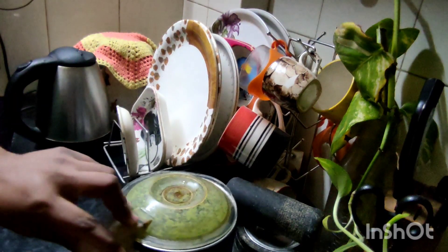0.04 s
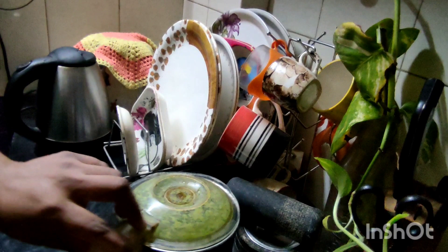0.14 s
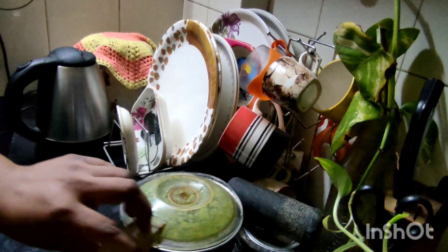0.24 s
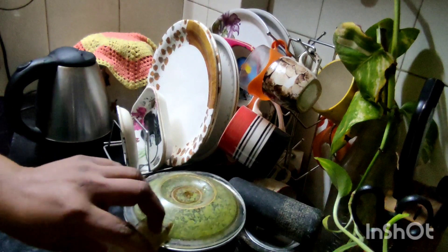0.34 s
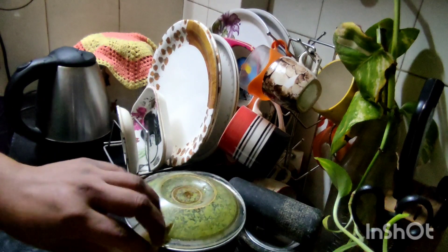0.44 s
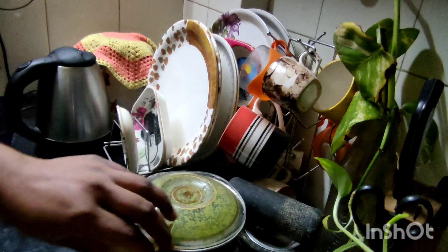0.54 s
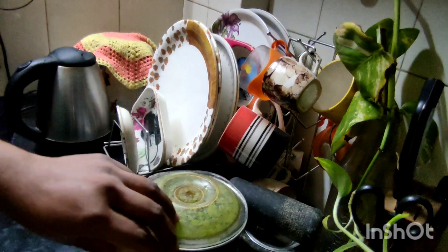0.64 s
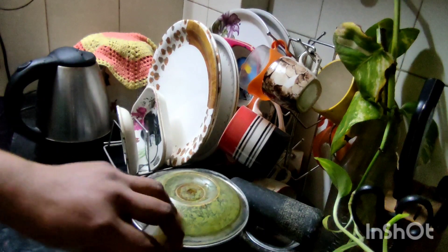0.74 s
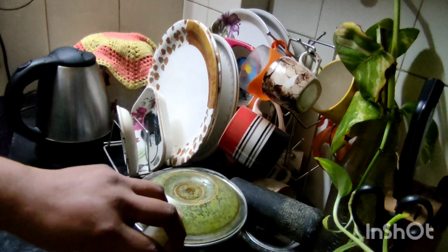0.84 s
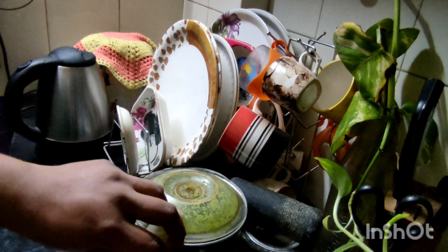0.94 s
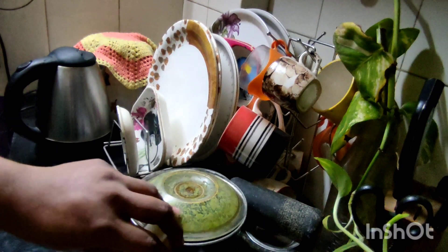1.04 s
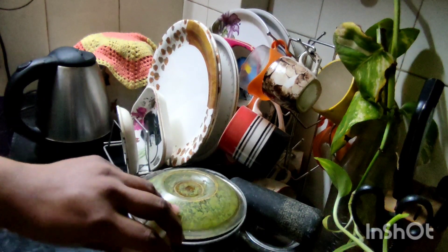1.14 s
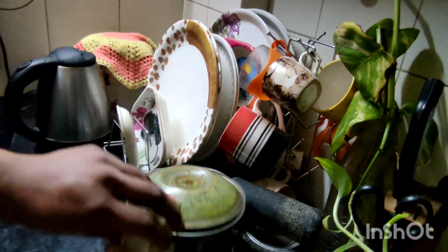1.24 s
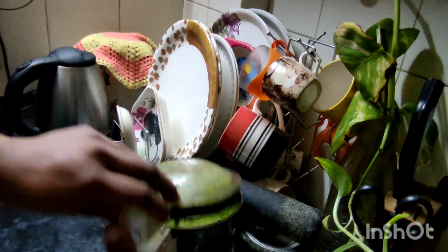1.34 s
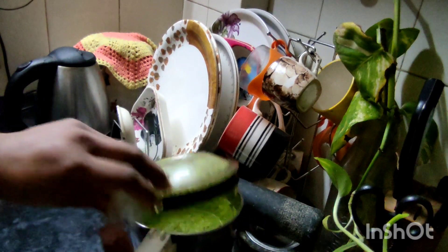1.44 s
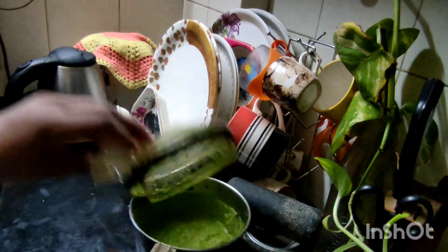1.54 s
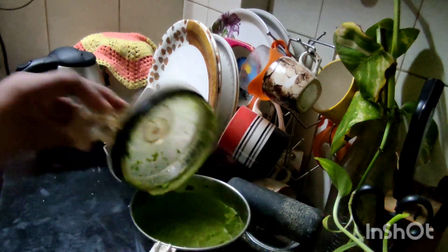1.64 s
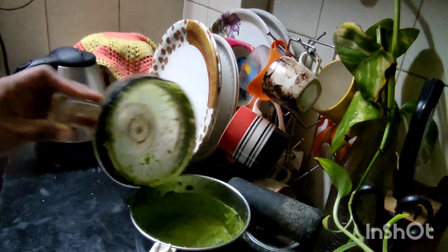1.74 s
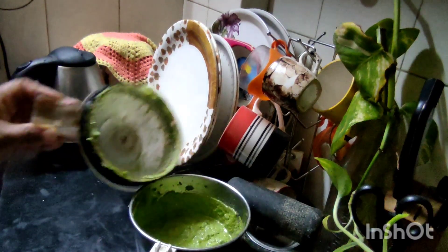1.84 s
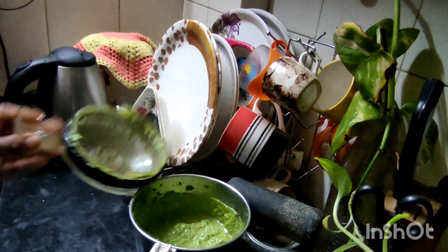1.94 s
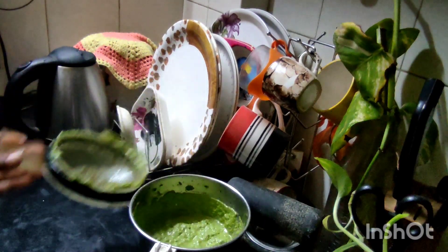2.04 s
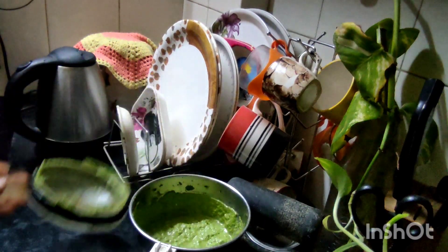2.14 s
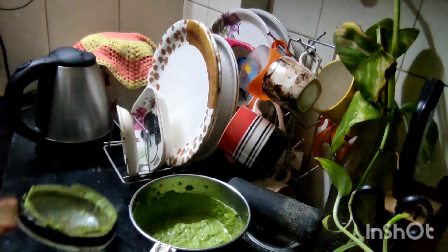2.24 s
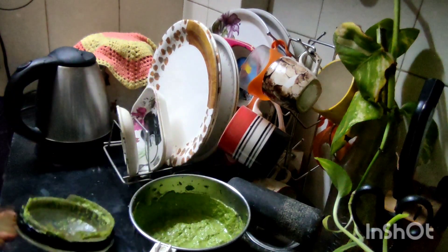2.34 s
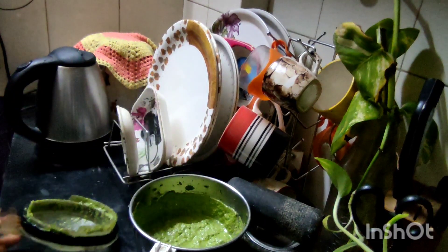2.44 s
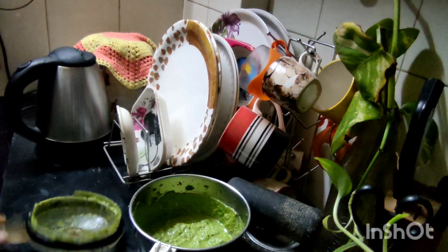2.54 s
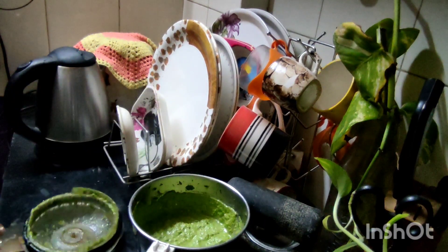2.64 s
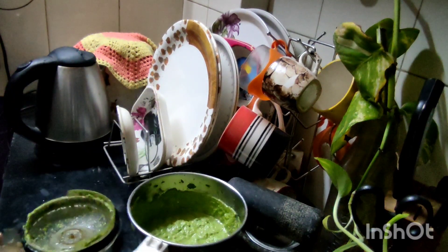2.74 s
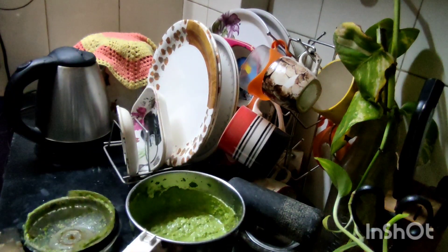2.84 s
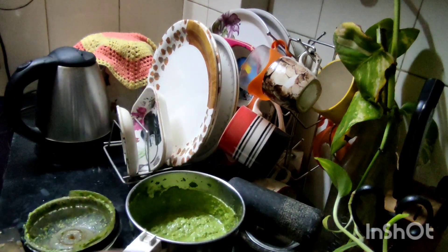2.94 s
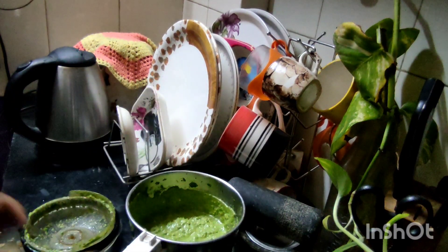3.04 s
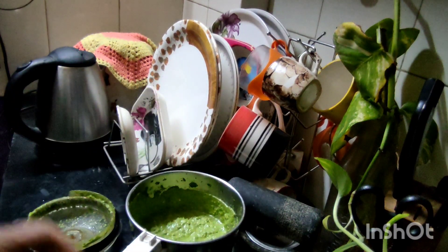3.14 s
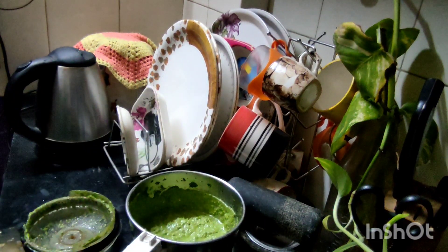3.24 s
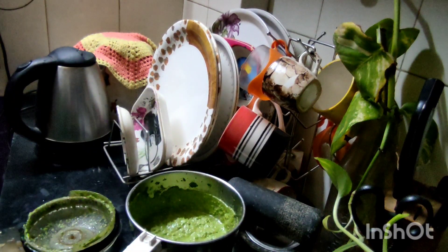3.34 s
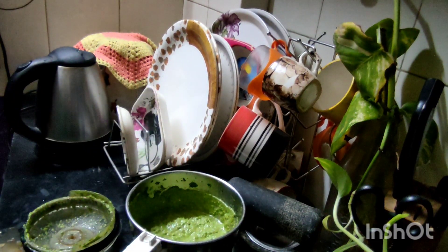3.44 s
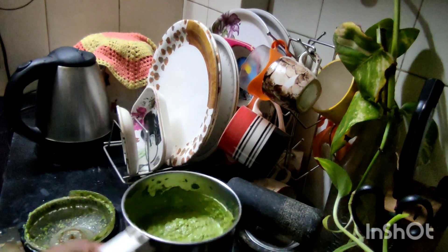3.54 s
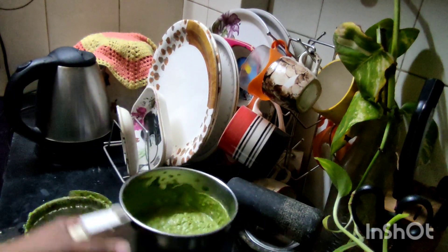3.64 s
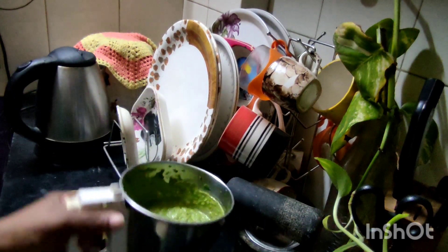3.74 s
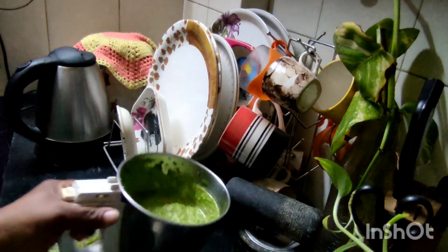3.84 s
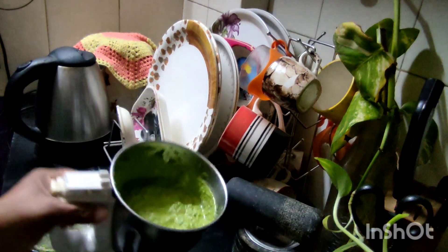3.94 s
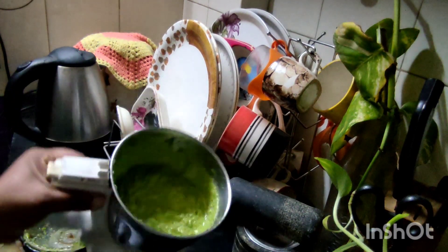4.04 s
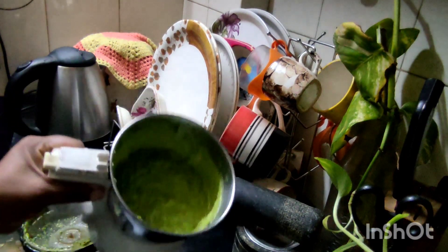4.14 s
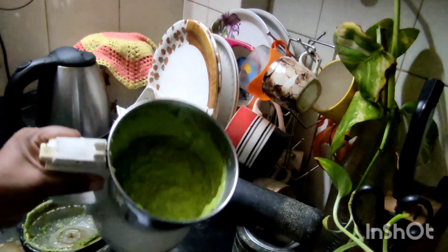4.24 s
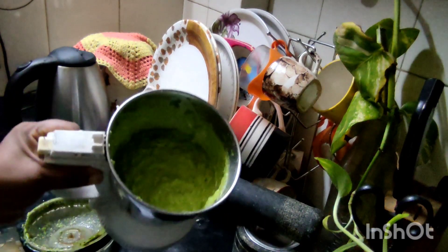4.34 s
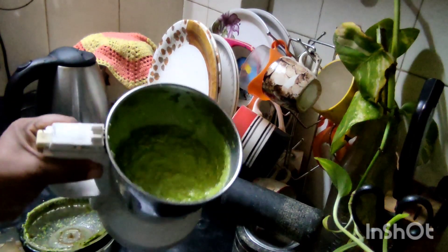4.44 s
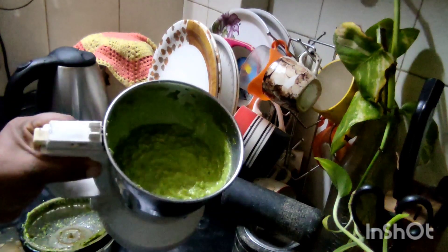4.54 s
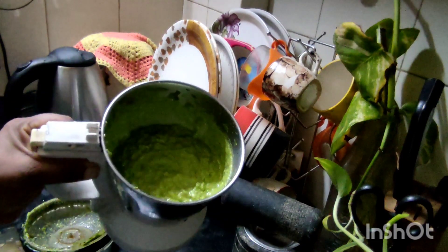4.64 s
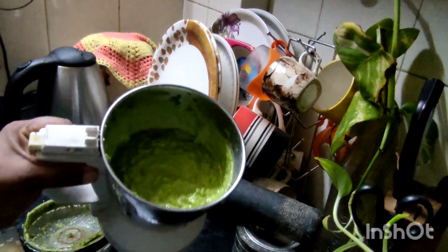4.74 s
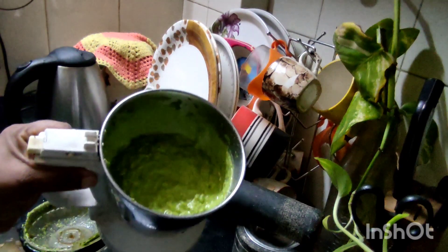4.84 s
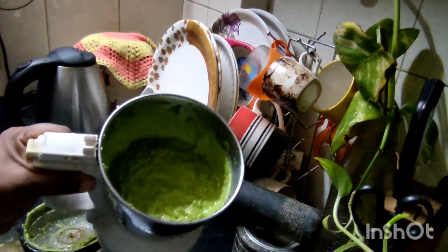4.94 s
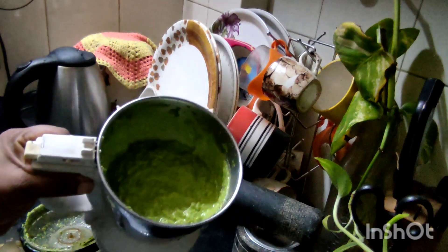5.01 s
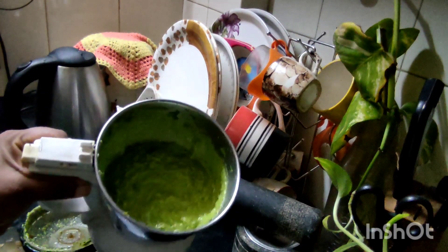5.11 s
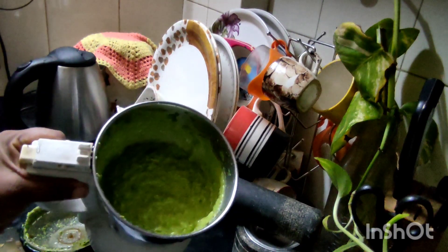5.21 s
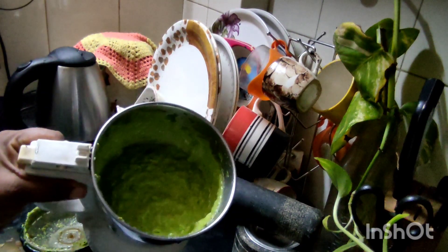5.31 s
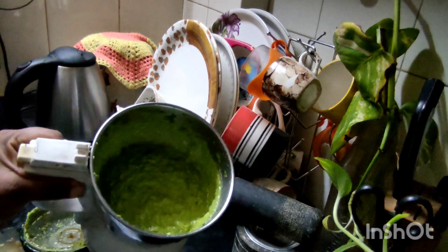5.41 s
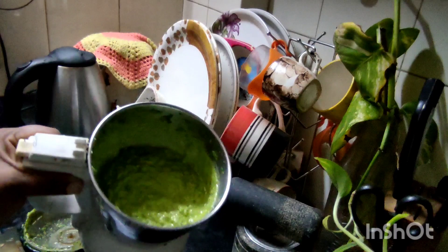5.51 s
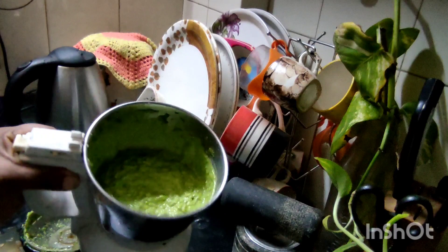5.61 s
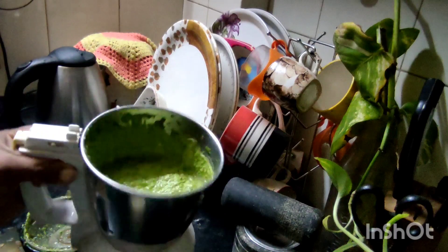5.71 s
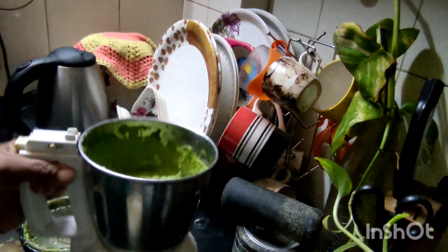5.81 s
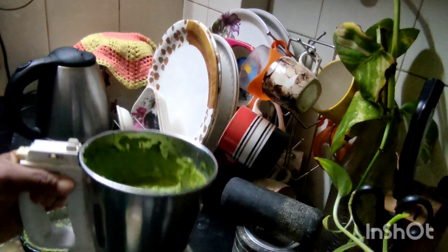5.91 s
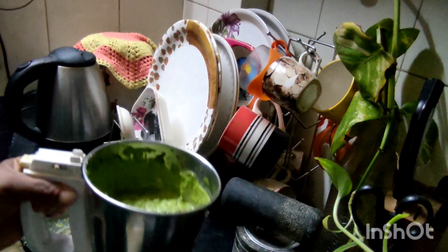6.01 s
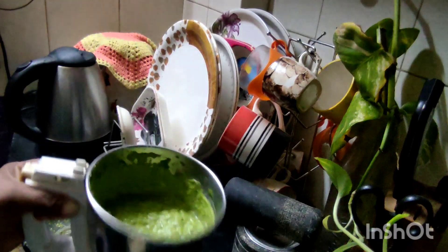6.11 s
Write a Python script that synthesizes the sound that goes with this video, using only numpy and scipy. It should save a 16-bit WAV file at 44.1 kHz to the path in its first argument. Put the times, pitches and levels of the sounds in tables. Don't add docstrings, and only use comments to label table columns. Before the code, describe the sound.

Close to the microphone, a hand rubs and taps a tight plastic lid on a stone counter with dull thuds. The seal gives way in one loud pop, the lid clacks down, a steel jar knocks sharply and, when lifted, rings briefly. Then quiet: low town rumble with far hoarse crows and a thin bird whistle.

```python
import sys
import numpy as np
from scipy import signal
from scipy.fft import rfft, irfft, next_fast_len
from scipy.io import wavfile
from scipy.ndimage import uniform_filter1d

SR = 44100
rng = np.random.default_rng(int(sys.argv[2]) if len(sys.argv) > 2 else 0)


def convert_level_to_amplitude(level_db):
    exponent = np.asarray(level_db, float) / 20
    return 10 ** exponent


def wav_record(signal):
    frames = np.transpose(np.atleast_2d(signal))
    bounded = np.clip(frames, -1, 1)
    quanta = np.round(bounded * 32767).astype(np.int16)
    wavfile.write(sys.argv[1], SR, quanta)


N = 272097

# frequency in Hz, density in dB per Hz.
TOWN_SPECTRUM = [(14, 2), (23, 1), (31, -19), (50, -22), (64, -4), (100, -9.5), (190, -16.5), (245, -23),
                 (305, -18), (400, -25.5), (900, -29.5), (2400, -35.5), (7000, -45), (9400, -52.5),
                 (13800, -46.5), (14500, -63.5)]
# frequency in Hz, left-right correlation.
PORT_LIKENESS = [(60, 0.89), (180, 0.89), (540, 0.065), (1630, -0.081), (4880, -0.14), (14700, -0.01)]
# time in s, spread in s, swell in dB, highest pitch reached in Hz.
VEHICLE_PASSES = [(.001, 0.2, 5.5, 59.7), (.45, 0.091, 3, 90), (1.6, 0.35, 6.5, 60), (2.0, 0.26, 2.5, 150),
                  (2.6, 0.29, 5.5, 80), (3.2, 0.36, 4, 89), (3.9, 0.27, 6, 90), (4.58, 0.18, 15, 40),
                  (4.9, 0.11, 4.5, 120), (6.0, 0.055, 4, 60)]
# start in s, length in s, pitch in Hz, level in dB, 4th harmonic against it in dB.
EVEN_CAWS = [(1.97, 0.17, 556, -70, -7.5), (2.35, 0.27, 543, -67, -12), (2.925, 0.23, 517.6, -66.5, -5.5),
             (3.67, 0.18, 588.5, -60, -17), (4.05, 0.18, 520, -67.5, -7), (4.237, 0.16, 532, -69.5, -27),
             (4.701, 0.11, 560, -65.5, -29), (5.695, 0.23, 532, -65, -11), (6.118, 0.08, 502, -76, -10)]
# start in s, length in s, pitch in Hz, level in dB, 4th harmonic in dB.
FALLING_CAWS = [(4.9, 0.18, 560, -63, -9), (5.02, .2, 565, -64, -16), (.935, 0.17, 590, -65, -31),
                (5.3, 0.22, 594, -69.5, -23)]
# start in s, length in s, pitch in Hz, level in dB, 4th harmonic in dB.
OPEN_CAWS = [(.25, .12, 481, -74, -9.5), (4.79, 0.24, 520, -64.5, -22), (5.42, 0.15, 526, -70, -22),
             (5.55, 0.15, 490, -74.5, -20)]
# start in s, length in s, start pitch in Hz, end pitch in Hz, level in dB.
CHIRPS = [(0.9, 0.12, 7000, 7000, -73), (2.95, .15, 6500, 6400, -94), (4.151, 0.22, 6240, 5500, -79),
          (5.104, 0.23, 7000, 7000, -76), (5.504, 0.16, 6350, 5100, -77.5),
          (6.051, 0.16, 5600, 6100, -77.5)]
# frequency in Hz, t60 in s.
KITCHEN_DECAY = [(150, 0.37), (600, 0.41), (2000, 0.33), (6000, 0.33), (12000, 0.3)]
# frequency in Hz, level in dB, t60 in s.
COUNTER_MODES = [(96.8, 3.5, 0.44), (117.1, -3.5, 0.39), (143.7, -7, 0.61), (186.5, 0, 0.26),
                 (228.2, -5, 0.19), (302.6, -12, 0.47), (402.4, -15.5, 0.32), (451.7, -19, 0.25),
                 (520, -9, 0.044)]
# start in s, blow in dB, weight of upper modes in dB, factor on t60.
THUDS = [(0.097, -29.5, -20, 0.73), (0.115, -25, -21, 0.6), (0.176, -25, -10.5, 0.25),
         (0.178, -29, -32, 0.98), (0.222, -26.5, -12.5, 0.54), (0.255, -30, -11.5, 0.79),
         (0.273, -22.5, -11.5, 0.26), (.755, -48, 0, .5), (.795, -46, 0, .5), (0.838, -37, -1, 0.3),
         (1.086, -27, -26, 0.35), (1.177, -29.5, 1, 0.29), (1.23, -40.5, -9, 1), (1.388, -21, -29, 0.23),
         (1.394, -9, 2.5, 0.33), (1.429, -18, -2.5, 0.5), (1.519, -33, -0.5, 0.41),
         (1.579, -36.5, -9.5, 0.57), (1.738, -46, -3, 0.43), (2.231, -38.5, -38, 0.66),
         (2.605, -42.5, -10, 1), (2.747, -34.5, -11.5, 0.61), (3.362, -43, -2.5, 0.74),
         (3.428, -41, -13, 0.52), (3.545, -59.5, 8.5, 1), (3.791, -43.5, -11, 0.61), (3.846, -40, -7, 0.85)]
# start in s, level in dB, pitch in Hz, t60 in s.
FINGER_TAPS = [(0.22, -39, 596, 0.032), (0.254, -35, 505, 0.029), (0.84, -53.5, 623, 0.081),
               (1.087, -49.5, 640, 0.083), (1.177, -30, 832, 0.03), (1.286, -55, 520, 0.13),
               (1.328, -51, 549, 0.23), (1.396, -27, 500, .1), (1.42, -37, 460, .12),
               (1.866, -49, 1123, 0.079), (3.38, -56, 632, 0.16), (3.651, -44.5, 900, 0.032),
               (3.783, -48, 750, 0.051), (3.845, -35.5, 636, 0.045)]
# peak in s, rise in s, fall in s, pressure in dB, hollow share in dB.
RUB_STROKES = [
    [(.07, 0.34, 0.23, -56, -9), (.17, 0.0053, 0.18, -60.5, -7)],
    [(.53, 0.13, 0.2, -54, -34), (.648, 0.19, 0.13, -57.5, 3), (.85, 0.08, 0.096, -69.5, 6.5)],
    [(1.094, 0.035, 0.14, -53.5, -17), (1.15, 0.085, 0.059, -54, 0), (1.19, 0.083, 0.04, -52, -13.5)],
    [(1.33, .1, 0.077, -70, 5), (1.385, 0.052, 0.016, -54, -5)],
    [(2.3, 0.084, 0.23, -57, -20.5), (2.42, 0.1, .1, -62.5, 3.5), (2.6, 0.18, 0.033, -54, -18),
     (2.612, 0.0066, 0.1, -48.5, -16), (2.71, 0.079, 0.01, -60.5, -26)],
    [(2.92, 0.048, 0.49, -68.5, -17), (3.17, 0.066, 0.34, -76.5, -6), (3.375, 0.03, 0.18, -57, -33),
     (3.445, 0.014, 0.06, -55, -8), (3.5, 0.11, 0.064, -48, -6), (3.58, 0.13, 0.13, -49, -10.5)],
    [(3.786, 0.0067, 0.1, -53.5, -15), (3.82, .03, 0.043, -64, 3)],
    [(4.552, 0.046, 0.099, -82.5, 10), (4.61, 0.061, 0.35, -84, -3)],
]
# frequency in Hz, density in dB per Hz.
RUB_SPECTRUM = [(250, -32), (500, -11), (1000, -5), (1800, -3), (3000, -4), (5000, -9.5), (7500, -12.5),
                (9500, -27.5), (14000, -27.5), (14600, -60)]
# frequency in Hz, width in Hz, level in dB.
RUB_HOLLOWS = [
    [(2970, 220, -5.5), (6650, 1070, -21)],
    [(1693, 120, -7), (1877, 150, -7), (2710, 160, -15), (4400, 3000, -25)],
    [(770, 270, -2), (1798, 150, 0.5), (2165, 290, -1), (2790, 190, 3.5), (3006, 110, 2.5),
     (3870, 240, -11), (4880, 190, -4.5), (5700, 230, -8), (6200, 148, -5)],
    [(560, 110, 2), (1800, 270, -6)],
    [(2200, 140, 1), (1286, 200, 1), (7000, 1320, -26)],
    [(1722, 84, -4), (1850, 170, -0.5), (2880, 220, 0), (1020, 120, -12), (3790, 90, -10), (5430, 90, -10),
     (5790, 110, -12), (6950, 91, -9)],
    [(2150, 140, -1), (3360, 120, -5), (7100, 920, -13)],
    [(3740, 1400, -2.5)],
]
# brightness in dB, counter shake against pressure in dB, left-right in dB,
# rise of hollow pitch in share per s.
RUB_SURFACES = [(-2.5, -3.5, -1, .01), (-3, -3.5, -2.5, 0.13), (-4, -0.5, -1.5, 0.033), (-6, 6.5, -1, .01),
                (-6.5, -2.5, -0.5, 0.079), (-5, -5, -1, 0.3), (-8.5, 0, -1.5, .01), (7.5, -13, -3, .01)]
# start in s, blow in dB, brightness in dB, ring in dB, left-right in dB.
LID_KNOCKS = [
    (1.729, -38.5, -37, -1.5, -3),
    (1.853, -60, -35, 0, -1.5),
    (1.865, -39, -20, -5, -2.5),
    (1.879, -54, -30, 6, 1),
    (2.23, -22, 4.5, 2.5, -0.5),
]
# start in s, blow in dB, brightness in dB, ring in dB, left-right in dB.
JAR_KNOCKS = [
    (2.722, -28, -4.5, 4.6, -0.5),
    (2.75, -24.5, -0.5, 1.9, -1),
    (2.7535, -24.5, -4.5, 5.8, -0.2),
    (2.775, -40.5, -11, 7.7, -1),
]
# start in s, blow in dB, brightness in dB, ring in dB, left-right in dB.
LIFT_KNOCKS = [
    (3.8455, -24, -8, -11.5, -0.42),
    (3.849, -36, -15.5, 10, -1),
    (3.862, -47, -17, 10, -1),
    (3.877, -46.5, -19, 11.5, -1),
]
# start in s, blow in dB, brightness in dB, ring in dB, left-right in dB.
SEAL_KNOCKS = [
    (0.17, -34, -6, -6, -1.6),
    (0.84, -42, -41, -31, 4),
    (1.287, -46, -38, -20, 3),
    (1.395, -13.5, -12.5, -2, -1.5),
    (2.61, -37, -21, 3.5, -3),
    (3.368, -58, -17, 0, -1),
    (3.783, -42.5, -12, -8, 0),
]
# frequency in Hz, level in dB, t60 in s.
LID_MODES = [(618, -15.5, 0.27), (980, -2, 0.06), (1253, -4, 0.33), (1800, -21.5, 0.24), (2770, -21, 0.082),
             (3250, -1.5, 0.04), (3580, -13, 0.1), (4180, -22, 0.11), (4343, -9.5, 0.13), (6980, -8, 0.063),
             (1275, 2, .08)]
# frequency in Hz, level in dB, t60 in s.
JAR_MODES = [(628, -9, 0.15), (1375, 1, 0.15), (1420, 0, 0.19), (1610, -2, 0.055), (1893, -8, .07),
             (2337, -2.5, 0.16), (2744, -13, .15), (3090, -5, 0.13), (3305, -1.5, .14), (3454, 3, 0.1),
             (3927, 0.5, 0.06), (4400, -14, 0.092), (5480, -15.5, 0.13), (6880, -8.5, 0.093)]
# frequency in Hz, level in dB, t60 in s.
LIFTED_MODES = [(620, -11, .05), (1328, 0.5, 0.19), (1382, -4, 0.34), (1790, -13, .3), (2080, -7, .14),
                (2270, -10.5, 0.29), (2530, -5, .06), (2920, -3, 0.058), (3250, -5, 0.12),
                (3666, -2.5, 0.13), (3811, -10, 0.19), (4355, -8, 0.18), (5080, -14, 0.11),
                (7284, -16, 0.23)]
# frequency in Hz, level in dB, t60 in s.
SEAL_MODES = [(694, -11, 0.14), (977, -8, 0.04), (1420, -12.5, .04), (1604, -2, 0.04), (1920, 5, 0.027),
              (2347, 0.5, .03), (2637, 0, 0.036), (2820, -6, 0.048), (3297, -7, 0.043), (3770, -3.5, 0.03),
              (4900, -8.5, .04), (5500, -8, 0.018)]
# frequency in Hz, density in dB per Hz.
LID_CRACK = [(200, -36), (500, -5.5), (900, -8.5), (1500, -21), (2500, -18), (3600, -16), (7200, -14.5),
             (9500, -26), (13500, -33), (15500, -34)]
# frequency in Hz, density in dB per Hz.
JAR_CRACK = [(180, -46), (300, -7), (1060, -10), (1380, -9.5), (2840, -4.5), (3400, -8.5), (7230, -14.5),
             (13700, -53), (15100, -67)]
# frequency in Hz, density in dB per Hz.
SEAL_CRACK = [(240, -41), (400, -8), (735, -10), (1550, -16.5), (3070, -18.5), (3510, -20.5), (6760, -19.5),
              (8750, -34.5), (9730, -54), (14200, -54), (15100, -81)]
# dB per dB of brightness, offset in dB.
UPPER_LID, UPPER_JAR, UPPER_SEAL = (0.35, 2.2), (1.35, 9.3), (.01, .1)
# dB per dB of brightness, offset in dB.
UPPER_LIFTED = (0.65, 8.5)
MODE_TWINS = [
    (.014, .4, .35),
    (0.0239, 0.72, .5),
    (.022, .6, .35),
    (0.02, 0.86, 0.32),
]
# start in s, peak in dB, width in s.
PRESSURE_POPS = [
    (1.396, -10, .00022),
    (2.2305, -34, .0001),
    (1.7295, -44, .00025),
    (3.8457, -33, .00015),
]


def evened(x):
    return x / np.sqrt(np.mean(x ** 2) + 1e-20)


def read(points, hz):
    point_hz, value = np.transpose(points)
    return np.interp(np.log(hz + 1), np.log(point_hz + 1), value)


def add(mix, start_s, sound):
    part = mix[:, round(start_s * SR):][:, :sound.shape[-1]]
    part += sound[..., :part.shape[1]]


def highpassed(x, order, cutoff_hz):
    return signal.sosfilt(signal.butter(order, cutoff_hz, "high", fs=SR, output="sos"), x)


def coloured(x, points, tilt_db=0):
    size = next_fast_len(x.shape[-1] + 4096)
    hz = np.fft.rfftfreq(size, 1 / SR)
    shape_db = read(points, hz) + tilt_db * np.log2(np.maximum(hz / 3000, 1))
    return irfft(rfft(x, size) * convert_level_to_amplitude(shape_db), size)[..., :x.shape[-1]]


def resonate(x, hz, width_hz):
    turn = np.exp(2j * np.pi * np.cumsum(hz * np.ones(x.shape[-1])) / SR)
    pole = np.exp(-np.pi * width_hz / SR)
    return 2 * (turn * signal.lfilter([1 - pole], [1, -pole], x / turn)).real


def resonate_twice(x, hz, width_hz, second_width_hz):
    return resonate(resonate(x, hz, width_hz), hz, second_width_hz)


def panned(x, pan_db):
    return x * convert_level_to_amplitude(np.array([pan_db, -pan_db]).reshape(2, -1) / 2)


def ring(modes, t, upper_db, above_hz, damping, spread, split=0, twin=.96):
    out = np.zeros((2, len(t)))
    for hz, db, t60_s in modes:
        phase = spread * rng.uniform(-np.pi, np.pi, (2, 2, 1))
        pair = np.sin(2 * np.pi * hz * t + phase[0])
        pair = pair + twin * np.sin(2 * np.pi * hz * (1 + split) * t + phase[1])
        out += convert_level_to_amplitude(db + upper_db * (hz > above_hz) - 60 * t / (t60_s * damping)) * pair
    return out


def town():
    frames, hz = N // 512 + 5, np.fft.rfftfreq(2048, 1 / SR)
    a, b, c, d, patches = rng.standard_normal((frames, 1025, 5)).T
    patches = uniform_filter1d(patches, size=20, axis=0)
    patches = evened(uniform_filter1d(patches, size=8, axis=1))
    same = np.clip(read(PORT_LIKENESS, hz), -1, 1)[:, None]
    left = a + 1j * b
    right = same * left + np.sqrt(1 - same ** 2) * (c + 1j * d)
    t = np.arange(frames) * 512 / SR
    swell_db = 0
    for time_s, spread_s, db, top_hz in VEHICLE_PASSES:
        reach = np.clip(1 - (hz[:, None] / top_hz) ** 2, 0, 1)
        swell_db = swell_db + db * np.exp(-((t - time_s) / spread_s) ** 2) * reach
    patch_db = np.clip(hz / 300, .3, 1)[:, None] * 2.2 * patches
    z = np.array([left, right]) * convert_level_to_amplitude(read(TOWN_SPECTRUM, hz)[:, None] + patch_db + swell_db)
    return convert_level_to_amplitude(-51) * evened(signal.istft(z, nperseg=2048, noverlap=1536)[1][:, :N])


def caw(length_s, hz, *harmonic_db, sag=.012, blur_hz=45, clear=1):
    t = np.arange(0, length_s + .2, 1 / SR)
    pitch_hz = hz * (1 + sag / 2 - sag * np.minimum(t / length_s, 1.2) ** 2)
    attack = np.sin(np.pi / 2 * np.minimum(t / 0.028, 1)) ** 2
    swell = attack * convert_level_to_amplitude(-110 * np.maximum(t - 0.86 * length_s, 0))
    hoarse = rng.standard_normal((2, len(t)))
    lines = [evened(resonate_twice(hoarse, k * pitch_hz, blur_hz * k, blur_hz * k)) for k in (2, 3, 4)]
    voiced = np.sin(4 * np.pi * np.cumsum(pitch_hz) / SR + np.array([[0], [1.3]]))
    lines[0] = evened(lines[0] + clear * voiced)
    return swell * sum(convert_level_to_amplitude(db) * line for db, line in zip(harmonic_db, lines))


def even_caw(length_s, hz, db, fourth_db):
    return caw(length_s, hz, db, db - 18, db + fourth_db)


def falling_caw(length_s, hz, db, fourth_db):
    return caw(length_s, hz, db, db - 10, db + fourth_db, sag=.06, blur_hz=70, clear=.5)


def open_caw(length_s, hz, db, fourth_db):
    return caw(length_s, hz, db - 9, db, db + fourth_db, sag=.1, blur_hz=45, clear=0)


def chirp(length_s, start_hz, end_hz, db):
    t = np.arange(0, length_s, 1 / SR)
    hz = start_hz + (end_hz - start_hz) * t / length_s
    whistle = resonate_twice(rng.standard_normal((2, len(t))), hz, 600, 600)
    return convert_level_to_amplitude(db) * evened(whistle) * signal.windows.tukey(len(t), .6)


def kitchen(x):
    echoes = np.zeros((2, SR // 2))
    slots = np.arange(200, SR // 2 - 20, 20)
    at = slots + rng.integers(0, 20, (2, (SR // 2 - 201) // 20))
    np.put_along_axis(echoes, at, rng.choice([-1., 1.], at.shape), 1)
    hz, t, z = signal.stft(echoes, SR, nperseg=256)
    tail = signal.istft(z * convert_level_to_amplitude(-60 * t / read(KITCHEN_DECAY, hz)[:, None]), SR, nperseg=256)[1]
    return signal.fftconvolve(x, tail / np.linalg.norm(tail[0]), axes=1)[:, :N]


def thud(blow_db, upper_db, damping):
    t = np.arange(SR // 3) / SR
    slab = ring(COUNTER_MODES, t, upper_db + 8, 150, np.clip(damping, .1, 2), .05)
    return 0.19 * convert_level_to_amplitude(blow_db) * slab * np.minimum(t / 0.0051, 1)


def finger_tap(db, hz, t60_s):
    t = np.arange(SR // 8) / SR
    note = ring([(hz, 0, t60_s), (1.3 * hz, -8, t60_s)], t, 0, 0, 0.54, 0.3, twin=0)
    return 1.6 * convert_level_to_amplitude(db) * note * np.minimum(t / 0.0019, 1)


def pressure(rows, t):
    peak_s, rise_s, fall_s, db, hollow_db = np.transpose(rows)[..., None]
    before = np.maximum(peak_s - t, 0) / abs(rise_s)
    after = np.maximum(t - peak_s, 0) / abs(fall_s)
    push = convert_level_to_amplitude(db - 25.5 * (before ** 1.48 + after ** 1.62))
    return push.sum(axis=0), (push * convert_level_to_amplitude(hollow_db)).sum(axis=0)


def rub(rows, hollows, bright_db, shake_db, pan_db, glide):
    first_s, last_s = rows[0][0], rows[-1][0]
    start_s = max(first_s - .3, 0)
    t = start_s + np.arange(round((last_s - first_s + .7) * 20) * SR // 20) / SR
    push, hollow_push = pressure(rows, t)
    grip_db = 15 * uniform_filter1d(rng.exponential(1, len(t)), size=40)
    grip_db = grip_db + 2 * evened(uniform_filter1d(rng.standard_normal(len(t)), size=600))
    slips = convert_level_to_amplitude(grip_db) * rng.standard_normal((3, len(t)))
    hiss = evened(coloured(.5 * slips[0] + slips[1:], RUB_SPECTRUM))
    hiss = hiss + (convert_level_to_amplitude(bright_db + 11.0) - 1) * highpassed(hiss, 2, 6500)
    bend = 1 + glide * np.clip(t - last_s + .05, -.2, .2)
    hollow = sum(convert_level_to_amplitude(db) * evened(resonate_twice(slips[1:], hz * bend, width_hz, 2 * width_hz))
                 for hz, width_hz, db in hollows)
    shake = evened(sum(convert_level_to_amplitude(db) * resonate_twice(slips[0], hz, 39.7, 77) for hz, db, _ in COUNTER_MODES[2:6]))
    airborne = panned(push * hiss + hollow_push * hollow, pan_db)
    return start_s, airborne + convert_level_to_amplitude(shake_db - 6.5) * push * shake


def knock(modes, colour, upper, twins, blow_db, bright_db, ring_db, pan_db):
    t = np.arange(SR // 3) / SR
    split, twin, rattle_depth = twins
    chatter = rng.standard_normal((2, len(t))) * (convert_level_to_amplitude(-60 * t / 0.029) + 0.2 * convert_level_to_amplitude(-60 * t / 0.17))
    crack = coloured(chatter, colour, 0.55 * (bright_db + 7.5)) * np.minimum(t / 0.00076, 1)
    rattle = 1 + rattle_depth * evened(uniform_filter1d(rng.standard_normal((2, len(t))), size=200))
    body = ring(modes, t, upper[0] * bright_db + upper[1], 1700, .8, .3, split=split, twin=twin)
    body = body * rattle * np.minimum(t / 0.0012, 1)
    both = crack / abs(crack).max() + convert_level_to_amplitude(ring_db) * body / abs(body).max()
    return panned(convert_level_to_amplitude(blow_db) * both, pan_db)


def pop(db, width_s):
    u = np.arange(400) / SR / max(width_s, 1 / SR)
    return convert_level_to_amplitude(db) * u * (u - 2) * np.exp(1 - u) * np.ones((2, 1))


def scene():
    near, slab, far = np.zeros((3, 2, N))
    bodies = ((LID_KNOCKS, LID_MODES, LID_CRACK, UPPER_LID, MODE_TWINS[0]),
              (JAR_KNOCKS, JAR_MODES, JAR_CRACK, UPPER_JAR, MODE_TWINS[1]),
              (LIFT_KNOCKS, LIFTED_MODES, JAR_CRACK, UPPER_LIFTED, MODE_TWINS[2]),
              (SEAL_KNOCKS, SEAL_MODES, SEAL_CRACK, UPPER_SEAL, MODE_TWINS[3]))
    for rows, *body in bodies:
        for start_s, *row in rows:
            add(near, start_s, knock(*body, *row))
    for rows, hollows, surface in zip(RUB_STROKES, RUB_HOLLOWS, RUB_SURFACES):
        add(near, *rub(rows, hollows, *surface))
    events = ((EVEN_CAWS, even_caw, far), (FALLING_CAWS, falling_caw, far), (OPEN_CAWS, open_caw, far),
              (CHIRPS, chirp, far), (THUDS, thud, slab), (FINGER_TAPS, finger_tap, near),
              (PRESSURE_POPS, pop, near))
    for table, source, mix in events:
        for start_s, *row in table:
            add(mix, start_s, source(*row))
    slab = highpassed(slab, 3, 75)
    wet = kitchen(near + convert_level_to_amplitude(-7.0) * highpassed(slab, 2, 150))
    return near + convert_level_to_amplitude(-4) * wet + slab + far + town()


def band_limit(x):
    return signal.sosfilt(signal.butter(12, 15270, fs=SR, output="sos"), x)


def record(dry):
    below = signal.oaconvolve(dry, signal.firwin(255, 14350, fs=SR)[None], "same", axes=1)
    return band_limit(below + convert_level_to_amplitude(-16) * (dry - below))


dry = scene()
out = record(dry)
wav_record(out)
```